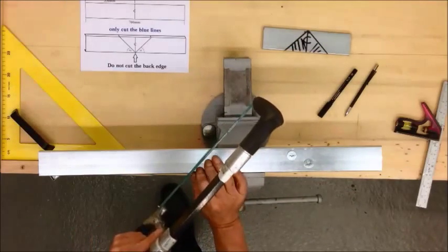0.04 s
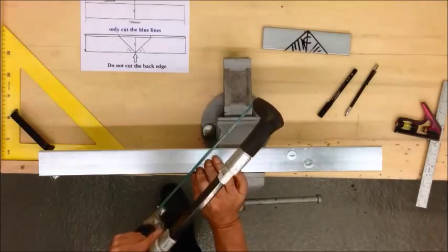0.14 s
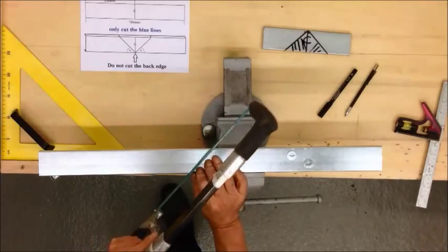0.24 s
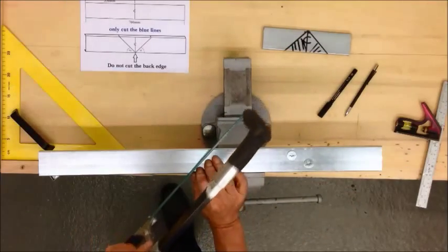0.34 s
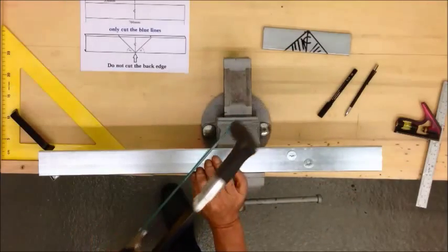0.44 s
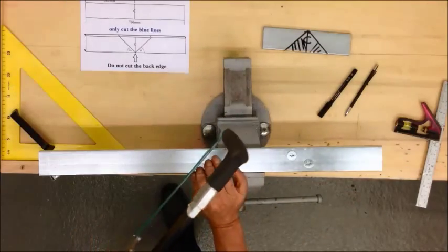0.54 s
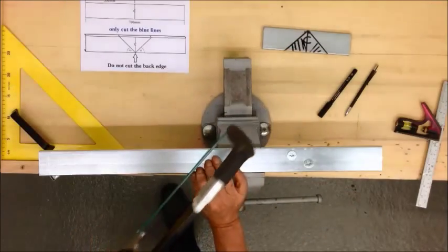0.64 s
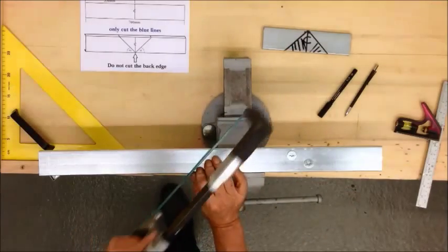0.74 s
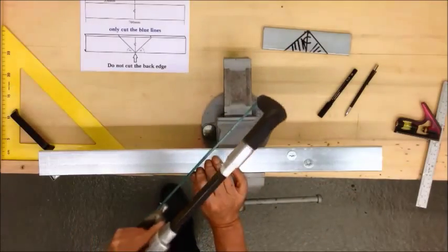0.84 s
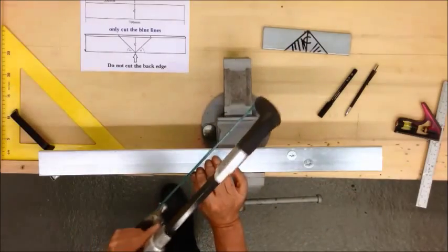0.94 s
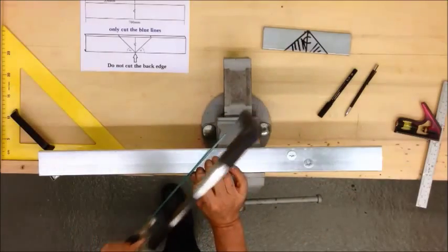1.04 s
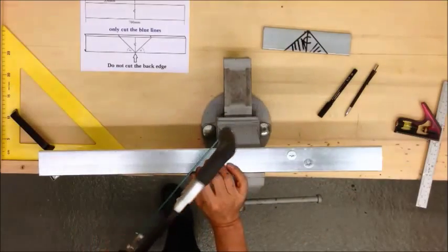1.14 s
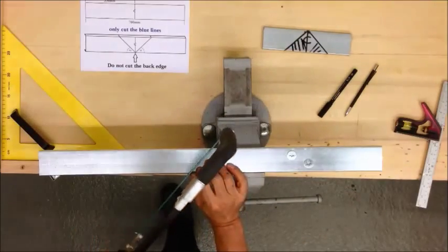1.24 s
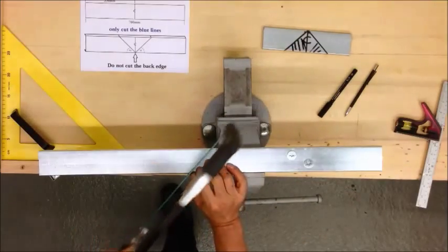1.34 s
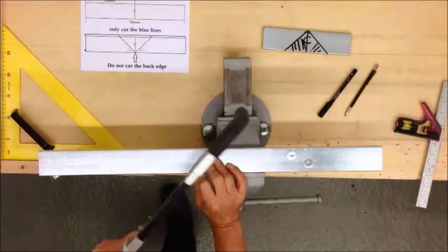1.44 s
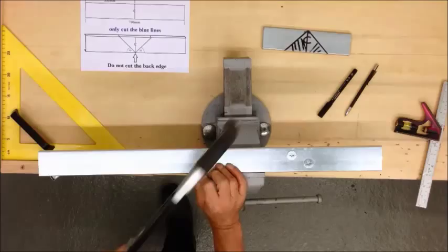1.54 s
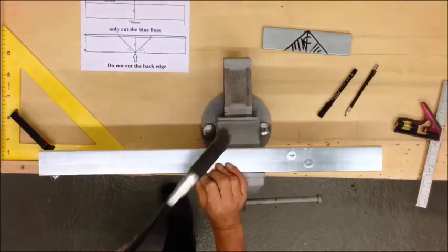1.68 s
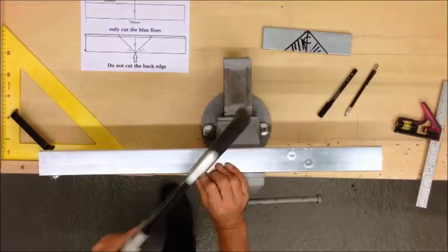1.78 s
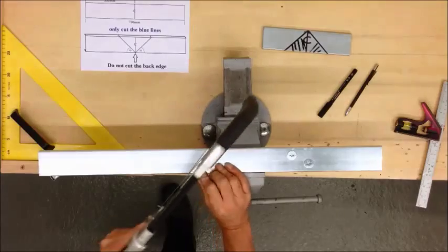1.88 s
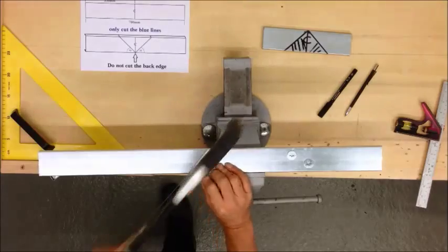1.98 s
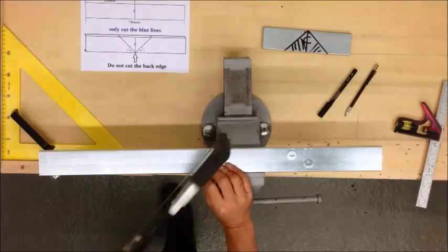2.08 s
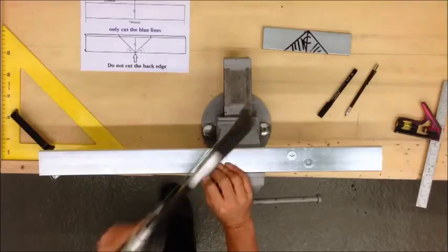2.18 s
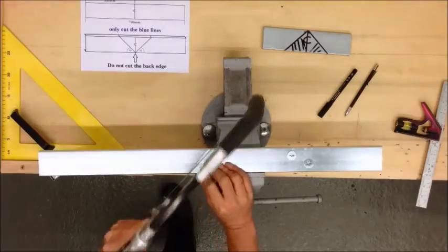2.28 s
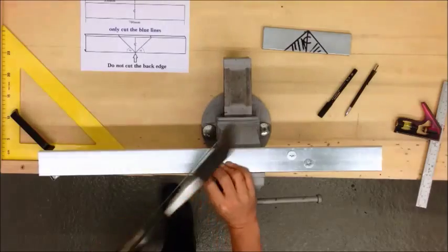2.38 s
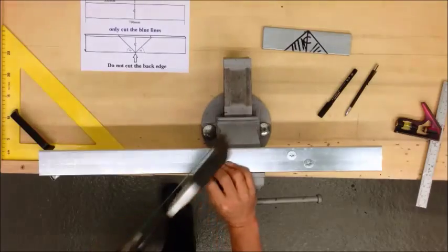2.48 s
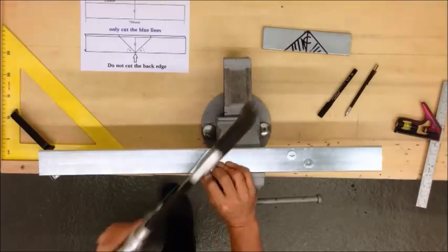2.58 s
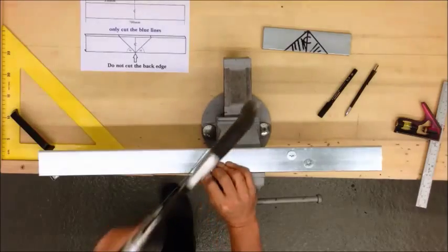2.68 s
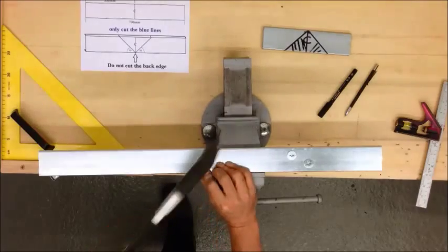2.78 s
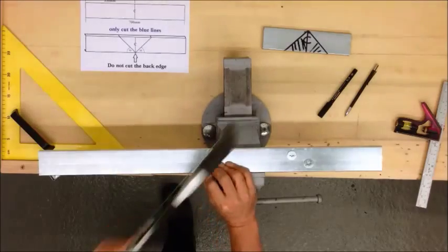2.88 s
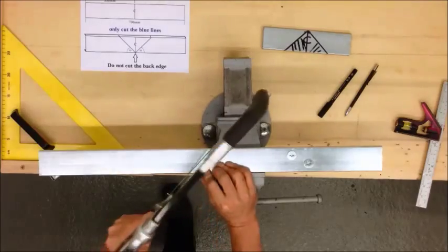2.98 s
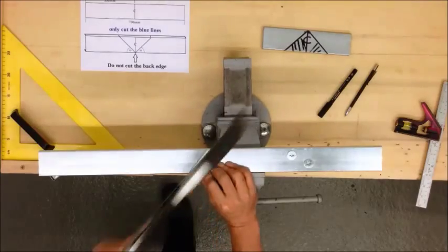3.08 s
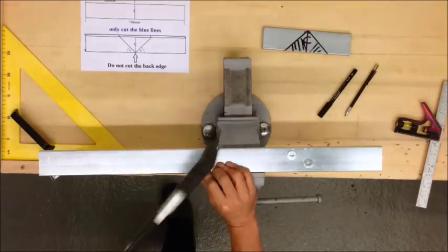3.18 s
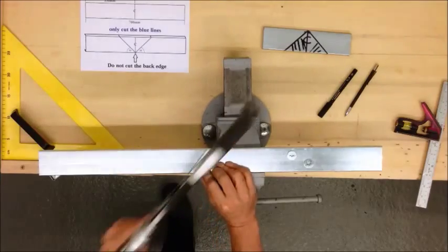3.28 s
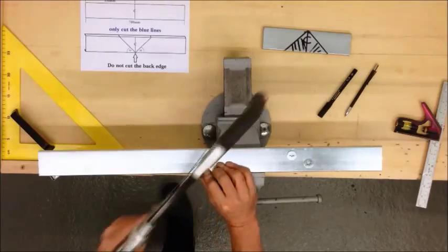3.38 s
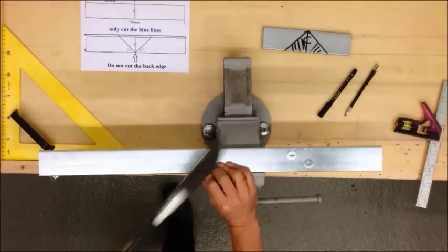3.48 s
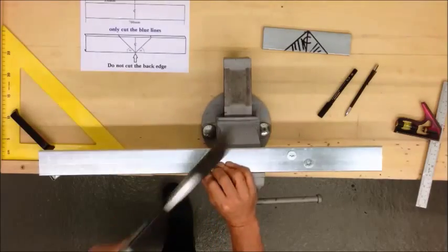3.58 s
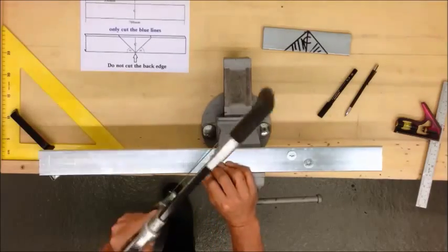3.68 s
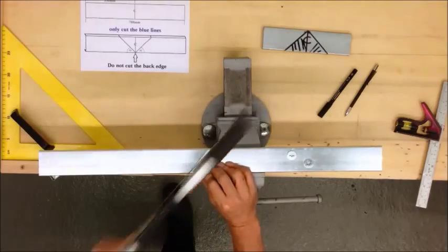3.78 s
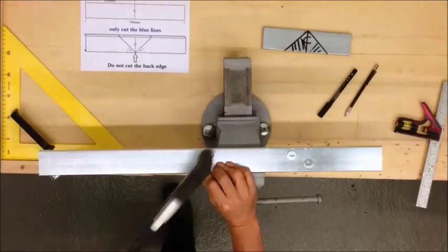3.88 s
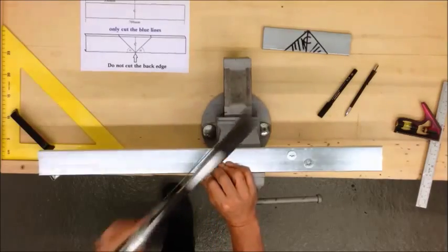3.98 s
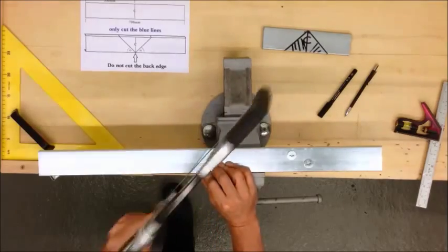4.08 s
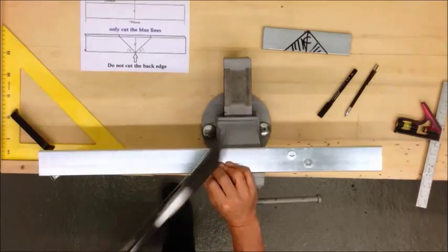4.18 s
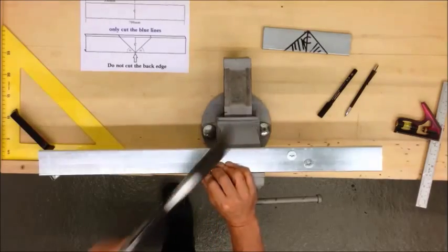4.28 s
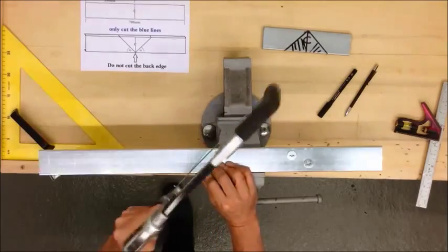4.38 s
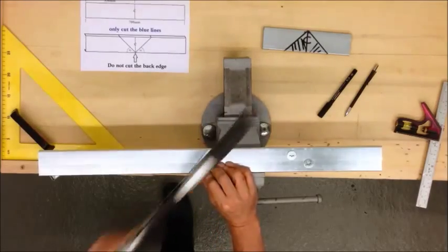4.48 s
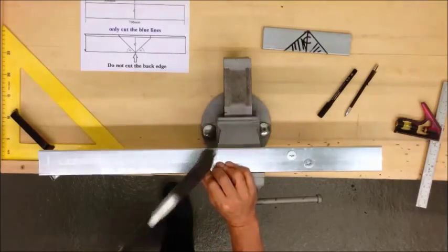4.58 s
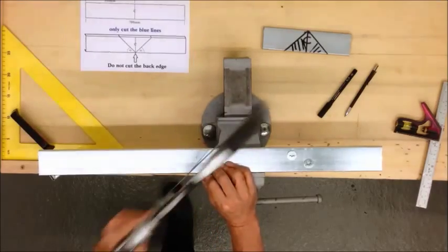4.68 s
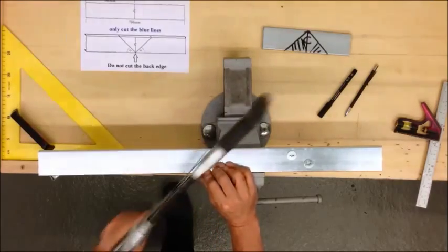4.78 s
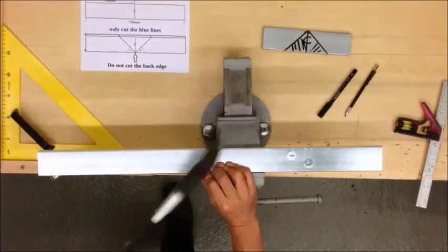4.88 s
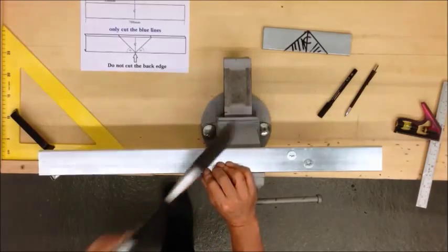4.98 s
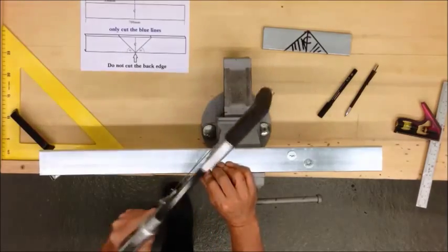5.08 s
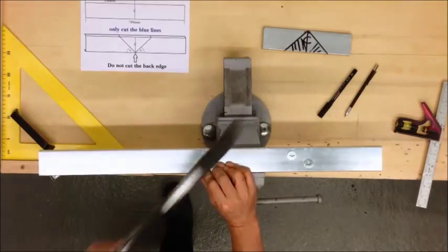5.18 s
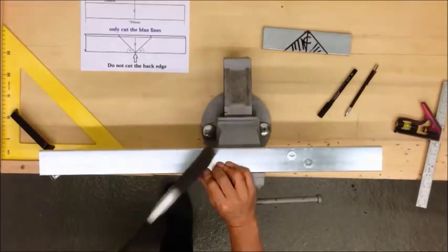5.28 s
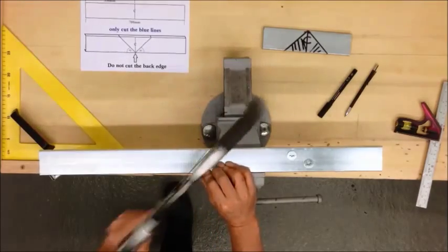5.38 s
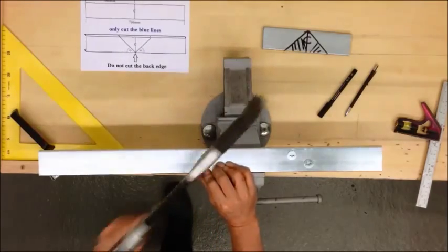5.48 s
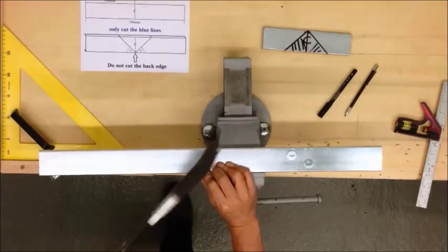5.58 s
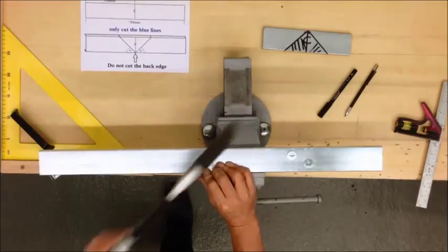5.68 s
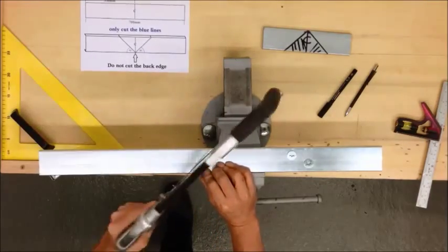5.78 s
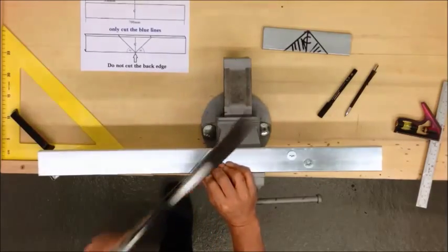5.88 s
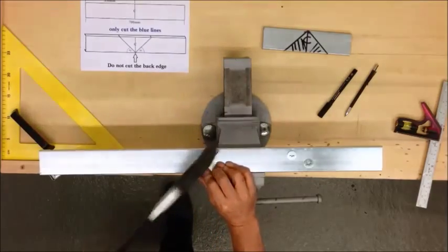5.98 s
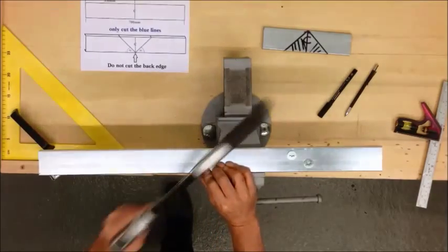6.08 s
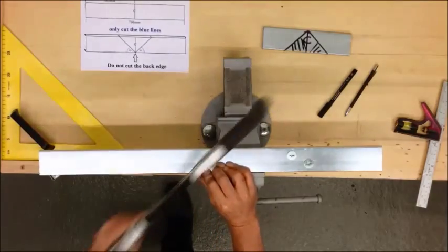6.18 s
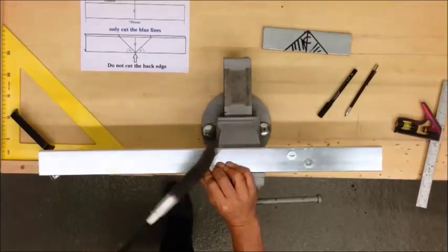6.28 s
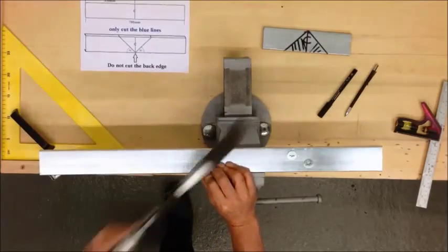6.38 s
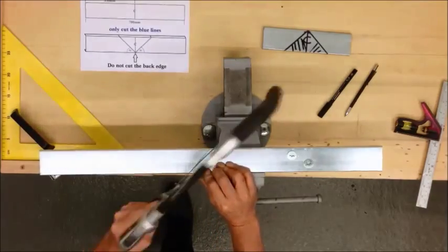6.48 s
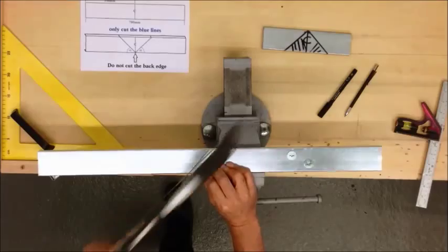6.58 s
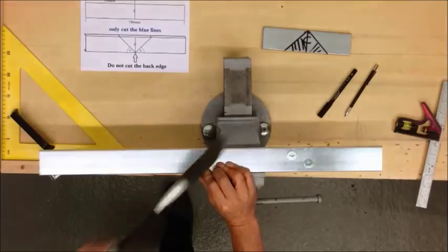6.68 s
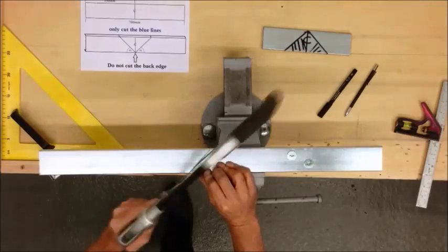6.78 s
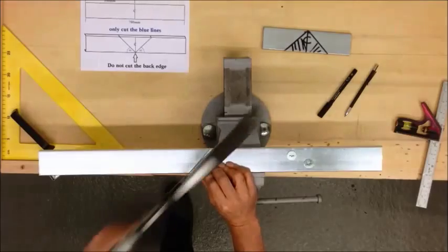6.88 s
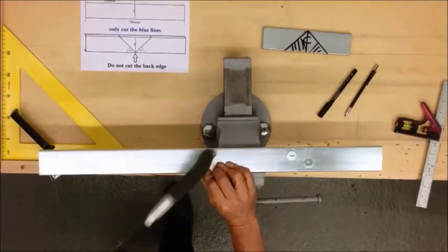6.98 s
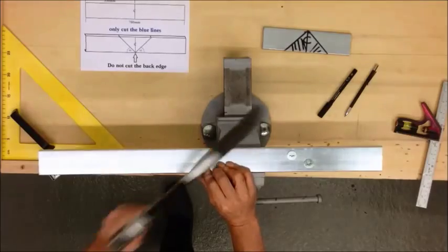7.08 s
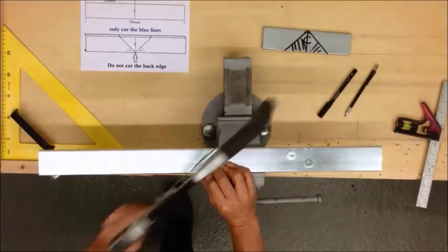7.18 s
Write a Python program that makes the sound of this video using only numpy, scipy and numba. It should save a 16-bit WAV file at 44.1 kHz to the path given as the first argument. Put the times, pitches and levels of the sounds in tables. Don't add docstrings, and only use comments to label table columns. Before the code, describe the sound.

Close-up hacksaw cutting a thin steel strip in a bench vise. A faint touch and hesitant scrapes come first, with sharp bites and small gaps; then push and pull strokes join into a fast, loud, even rasp, about six scrapes per second. The sheet rings nasally, chips hiss, the blade catches with brief squeaky chirps, and the bench thuds dully. Quiet ventilation and a short indoor echo lie behind.

```python
import sys
import numpy as np
from scipy import signal
from scipy.fft import rfft, irfft, next_fast_len
from scipy.io import wavfile
from scipy.ndimage import uniform_filter1d
from numba import njit

SR = 44100
rng = np.random.default_rng(int(sys.argv[2]) if len(sys.argv) > 2 else 0)


def invert_db(level):
    return 10 ** (np.asarray(level, dtype=float) / 20)


def int16_out(signal):
    q = np.round(np.clip(np.atleast_2d(signal).T, -1, 1) * 32767)
    wavfile.write(sys.argv[1], SR, q.astype(np.int16))


N = 319284

# pitch_hz, level_db per Hz
HUM = [(22, -22), (92, 10.5), (216, 0), (472, -1.5), (1270, -5), (4090, -19.5), (4780, -32), (15000, -26)]
HUM_DB = -72.5

# start_s, length_s, tooth_ringing_db, chip_hiss_minus_ringing_db, top_tooth_rate_hz
PUSHES = [(0.604, 0.1, -45.0, -3.0, 1560), (1.132, 0.2, -43, -4.5, 1410), (1.672, 0.13, -39.0, -5.5, 1424),
          (2.072, 0.18, -43.0, 0.5, 1716), (2.452, 0.17, -35, -2.0, 1554), (2.832, 0.17, -38.5, 2.5, 1711),
          (3.174, 0.17, -35.5, -0.5, 1703), (3.528, 0.19, -35, -1, 1725), (3.879, 0.18, -33.5, -1.5, 1750),
          (4.236, 0.16, -32.5, -2, 1763), (4.582, 0.16, -33.5, -1, 1930), (4.931, 0.17, -33, -4, 1840),
          (5.26, 0.1785, -32.0, -2.5, 2030), (5.601, 0.19, -33, -3, 1824), (5.975, 0.18, -33, -2, 2040),
          (6.303, 0.18, -31.5, -4, 1990), (6.645, 0.18, -32.0, -5, 2064), (6.99, 0.15, -30, -5.0, 2022)]
PULLS = [(-0.3, 0.57, -69, -7.5, 1412), (0.358, 0.36, -51, -7, 1386), (0.778, 0.21, -46.5, -2.5, 1480),
         (1.484, 0.12, -51, -2, 1455), (1.792, 0.21, -43.0, -4.0, 1422), (2.234, 0.17, -40.5, -3, 1648),
         (2.576, 0.21, -41, -3.5, 1596), (2.978, 0.17, -36.5, -2.5, 1716), (3.318, 0.19, -34, -4.0, 1690),
         (3.684, 0.19, -33.5, -3, 1816), (4.057, 0.16, -33.5, -1.5, 1905), (4.414, 0.15, -34.0, 0.5, 1920),
         (4.76, 0.14, -33.5, -2, 2020), (5.098, 0.15, -31.5, -2.5, 1750), (5.43, 0.17, -30, -6, 1810),
         (5.765, 0.18, -34, -4.5, 1780), (6.107, 0.2, -35.5, -4.5, 1970), (6.438, 0.22, -33, -7.5, 1960),
         (6.818, 0.17, -35.0, -6.5, 2016), (7.162, 0.14, -31.0, -6, 2170)]
TOUCHES = [
    (.336, .2, -59.5, -6.5, 1200),
    (.797, 0.099, -47, -9, 1290),
    (1.835, 0.1002, -44, -8, 1300),
    (6.495, 0.1347, -35, -5.5, 2200),
    (6.172, 0.1004, -37, -3.5, 2100),
]
# full_force_from_share, full_until_share, drop_at_start_db, drop_at_end_db,
# rate_glide_share, rate_sag_share, vise_peak_at_share
PUSH_SHAPE = (0.2008, 0.5494, 12.5, 12.5, .3, .25, 0.12)
PULL_SHAPE = (0.51, 0.8025, 11.5, 12.5, -.5, 0.73, -0.06)
REST_DB = -81
IDLE_TEETH_HZ, RATE_STRETCH = 1289, 1.05
CHIP_DEPTH, VISE_DEPTH = 0.11, -0.18
FRAME_DB, FRAME_PER_CHIP, FRAME_FADE_DB_PER_S = 1, 0.87, -0.83
VISE_DB, VISE_LOUDEST_S, VISE_FADE_DB_PER_S = -15, 2.9, -1.8
VISE_PEAK_DB, VISE_PEAK_WIDTH = 6, 0.14

# pitch_hz, width_hz, level_db
SHEET = [(1183, 31, -3.5), (1260, 27, -2.5), (1338, 11, 6.5), (1400, 14, -4.5), (1456, 12.5, -0.5),
         (1519, 19, -5), (1693, 15.4, -4), (1783, 26, -10), (1922, 29, -5.5), (2040, 13, -9),
         (2154, 35, -3), (2303, 49, -0.5), (2420, 35, 2), (2642, 51, -2)]
FLAP_HZ, FLAP_WIDTH_HZ = 1267, 217
FLAP_DB, FLAP_FADE_DB_PER_S = -2, -2.5

# pitch_hz, level_db per Hz
CHIPS = [(300, -42), (1030, -9), (1700, -9), (3000, -6.5), (4500, -8), (8000, -9.5), (12500, -16.5),
         (15500, -21)]
# pitch_hz, width_hz, level_db
BLADE = [(5152, 78, -11), (5931, 12, 5.5), (5964, 230, -11), (7520, 120, -7.5), (9140, 33, -14),
         (13100, 640, -15)]
# pitch_hz, width_hz, level_db
FRAME = [(3398, 43, -5.5), (3553, 18.6, -3.5), (3710, 83, -9), (3908, 24, -4.5), (4074, 42, 1),
         (4228, 60, -2.5), (4370, 40, -12)]
# time_s, pitch_hz
KERF = [
    (0, 3990),
    (2.2, 4125),
    (3.5, 4160),
    (7.24, 4014),
]

# pitch_hz, width_hz, level_db
TABLE = [(115.2, 22.4, -2.5), (193, 28.6, 0), (245.5, 42.4, -3.5), (355.2, 15, -5), (442, 29, -11.5)]
# pitch_hz, width_hz, level_db
VISE = [(543, 41, -7.5), (648.2, 14.8, 1.5), (770, 29, -2), (859, 44, 1), (921, 14.7, 5.5)]
# time_s, shudder_db, slow_sway_minus_shudder_db
SHOVES = [(0.51, -77, -17), (0.96, -64, -18), (1.26, -71, -11), (1.59, -61, -13), (1.82, -56.5, -13),
          (1.97, -58.5, -20), (2.38, -56.5, -15), (2.49, -58, -14), (2.76, -58, -21), (3.02, -58, -12),
          (3.21, -58, -21), (3.48, -56, -15), (3.859, -61, -9), (4.14, -49.5, -20), (4.46, -63, -22),
          (4.87, -62, -26), (4.989, -56, -16), (5.27, -58, -23), (5.59, -58, -25.5), (5.85, -57.5, -31),
          (6.08, -59, -23), (6.35, -68, -33), (6.53, -63, -18), (6.98, -59.5, -27), (7.09, -62, -27)]
SHOVE_S, SWAY_S = 0.043, 0.028
BENCH_DB, BENCH_PER_FORCE, SWAY_DB = -61.5, 0.62, -24
BENCH_FADE_DB_PER_S, SMOOTH_FROM_S = -2.5, 4.8
# time_s, level_db
GROANS = [(.95, -65), (1.14, -67), (2.0, -69), (2.36, -59), (2.95, -62), (3.12, -58), (3.47, -58),
          (3.669, -57), (4.08, -57), (4.22, -57), (4.56, -57.5), (5.58, -48.5), (5.74, -62), (5.93, -56),
          (6.25, -58), (6.63, -57.5)]
GROAN_S, GROAN_HZ, GROAN_WIDTH_HZ = 0.043, 580, 680

# time_s, peak_db
BITES = [(0.1645, -42), (0.194, -48.5), (0.3292, -57), (0.628, -24), (0.8101, -53), (1.126, -32),
         (1.489, -38.5), (1.6891, -46), (2.0724, -28), (2.452, -28), (2.8441, -28), (3.1913, -26),
         (3.548, -26), (3.905, -17), (4.2551, -17.5), (4.6108, -20.5), (4.7891, -17), (4.955, -19.5),
         (5.2861, -22.5), (5.64, -17), (5.9985, -27), (6.186, -19.5), (6.3232, -25), (6.678, -26.5),
         (7.002, -26), (7.1938, -30.5)]

# time_s, peak_db, chatter_hz
CATCHES = [(0.5687, -36, 1210), (0.6306, -43, 1360), (0.8089, -31.5, 1260), (1.113, -43, 1150),
           (1.2058, -38, 1408), (1.2634, -23.5, 1402), (1.577, -39, 1260), (1.6876, -34, 1244),
           (1.7275, -29, 1327), (2.1738, -29, 2380), (2.4546, -37, 1360), (2.845, -40, 1414),
           (3.05, -29, 1807), (3.2052, -28, 1210), (3.2411, -30, 1694), (3.3638, -27.5, 1263),
           (3.389, -21, 1683), (3.7391, -28, 1695), (3.9061, -39, 1440), (4.0836, -22, 1710),
           (4.14, -19.5, 2160), (4.2563, -32, 1412), (4.4316, -26.5, 2386), (4.472, -23.5, 2190),
           (4.5155, -22, 1746)]
# time_s, peak_db, chatter_hz
DEEP_CATCHES = [(4.6128, -21.5, 1932), (4.7891, -22, 2034), (4.8265, -18.5, 2180), (4.9578, -20, 1724),
                (5.0024, -26, 1910), (5.11, -24.5, 1340), (5.1398, -19, 1800), (5.1747, -17.5, 1820),
                (5.286, -21.5, 2390), (5.3074, -25.5, 1800), (5.471, -24, 1800), (5.5205, -18, 1790),
                (5.6414, -18.5, 1330), (5.6771, -19.5, 1930), (5.726, -30, 1930), (5.8899, -21.5, 1800),
                (5.9973, -22.5, 2404), (6.0264, -22.5, 1787), (6.0644, -32, 2330), (6.1875, -19.5, 2094),
                (6.3225, -22, 2450), (6.4269, -29, 2336), (6.5173, -21, 2106), (6.5895, -26.5, 2080),
                (6.6805, -15.5, 2450), (6.7272, -34, 2130), (6.8676, -22.5, 2120), (7.0019, -24, 2516),
                (7.0659, -28, 2420), (7.1976, -21.5, 2210)]
CATCH_SHAKE_DB = -16.5

ROOM_T60_S, ROOM_DAMP, ROOM_DB = 0.52, 0.19, -18.5
TOP_HZ = 15290


def unit(x):
    return x / np.sqrt(np.mean(x ** 2))


def curve(table):
    s, *columns = np.transpose(table)
    return [np.interp(np.arange(N) / SR, s, c) for c in columns]


def walk(rate):
    hold = int(SR / rate)
    steps = np.repeat(rng.standard_normal(N // hold + 1), hold)
    return 1.3 * uniform_filter1d(uniform_filter1d(steps, hold), hold)[:N]


def colour(x, points):
    hz, db = np.transpose(points)
    size = next_fast_len(N)
    f = np.arange(size // 2 + 1) * SR / size
    gain = invert_db(np.interp(np.log(f + 1), np.log(hz), db))
    return irfft(rfft(x, size) * gain, size)[:N]


@njit
def svf(x, hz, width):
    y, band, low = np.empty(len(x)), 0., 0.
    for i in range(len(x)):
        g, k = np.pi * hz[i] / SR, width / hz[i]
        g += g ** 3 / 3 + g ** 5 * 2 / 15
        v = (band + g * (x[i] - low)) / (1 + g * (g + k))
        band, low, y[i] = 2 * v - band, low + 2 * g * v, k * v
    return y


def steep_band(x, hz, width):
    centre = np.full(N, hz, float)
    return unit(svf(svf(x, centre, width), centre, width))


def ring(x, modes, patchy_db, rate):
    out = np.zeros(N)
    for k, (hz, width, db) in enumerate(modes):
        flickering = x * invert_db(patchy_db * walk(rate))
        out += (-1) ** k * invert_db(db) * svf(flickering, np.full(N, 1. * hz), 1. * width)
    return out


def grit(share, spread_db):
    chance = rng.random((2, N))
    size = invert_db(-spread_db * np.log(chance[0] + 1e-6)) * (chance[1] < share)
    return unit(size * rng.standard_normal(N))


def bumps(times_s, levels_db, width_s):
    t = np.arange(N) / SR
    return sum(invert_db(db) * np.exp(-((t - s) / width_s) ** 2) for s, db in zip(times_s, levels_db))


def workshop():
    return invert_db(HUM_DB + 1.0 * walk(3.4)) * unit(colour(rng.standard_normal(N), HUM))


def strokes():
    t = np.arange(N) / SR
    ring_db, chip_db = np.full(N, 1. * REST_DB), np.full(N, -6.)
    vise_db, rate_hz = np.zeros(N), np.full(N, 1350.)
    for rows, shape in ((PUSHES + TOUCHES, PUSH_SHAPE), (PULLS, PULL_SHAPE)):
        full, until, start_db, end_db, glide, sag, vise_at = shape
        for s, length, db, hiss_db, hz in rows:
            share = (t - s) / length
            rise_db = start_db * (share / full - 1)
            fall_db = end_db * (until - share) / (1 - until)
            drop_db = np.minimum(0, np.minimum(rise_db, fall_db))
            leads = db + drop_db > ring_db
            share, drop_db = share[leads], drop_db[leads]
            ring_db[leads] = db + drop_db
            chip_db[leads] = hiss_db + CHIP_DEPTH * np.maximum(drop_db, -start_db)
            peak = np.exp(-((share - vise_at) / VISE_PEAK_WIDTH) ** 2)
            vise_db[leads] = VISE_PEAK_DB * peak + VISE_DEPTH * drop_db
            along = 2 * np.clip(share, 0, 1) - 1
            speed = 1 + glide * along - sag * along ** 2
            rate_hz[leads] = IDLE_TEETH_HZ + RATE_STRETCH * (hz - IDLE_TEETH_HZ) * speed
    frame_db = FRAME_DB + FRAME_PER_CHIP * chip_db + FRAME_FADE_DB_PER_S * t
    vise_db = ring_db + vise_db + VISE_DB + VISE_FADE_DB_PER_S * np.abs(t - VISE_LOUDEST_S)
    return [uniform_filter1d(c, SR // 100) for c in (ring_db, chip_db, rate_hz, frame_db, vise_db)]


def teeth(rate_hz, pressure):
    wobble = 1 + .06 * walk(60) + .06 * walk(400)
    phase = np.cumsum(rate_hz * wobble) / SR
    pluck = np.sin(2 * np.pi * phase) * invert_db(2.9 * walk(150))
    force = pressure * (unit(pluck) + invert_db(7.5) * grit(.3, 3.2))
    bare = pressure * steep_band(grit(.3, 2.05), rate_hz, 940.0)
    flap = pressure * steep_band(grit(.3, 2.9), FLAP_HZ, FLAP_WIDTH_HZ)
    flap_level = invert_db(FLAP_DB + FLAP_FADE_DB_PER_S * np.arange(N) / SR)
    sheet = invert_db(2.5) * ring(force, SHEET, patchy_db=4.5, rate=40) + invert_db(-7.5) * bare + flap_level * flap
    swell = uniform_filter1d(sheet ** 2, SR // 30) / uniform_filter1d(pressure ** 2, SR // 30)
    sheet = sheet * np.maximum(swell, 1e-3) ** -.3
    band = signal.butter(3, (1100, 2750), "band", fs=SR, output="sos")
    return invert_db(-1.0) * signal.sosfilt(band, sheet)


def overtones(x, t60):
    t = np.arange(SR // 10) / SR
    response = rng.standard_normal(len(t)) * np.exp(-np.log(1000) * t / t60)
    return signal.fftconvolve(x, response / np.sqrt(np.sum(response ** 2)))[:N]


def chips(pressure, frame_pressure):
    force = pressure * invert_db(1.0 * walk(40)) * grit(.7, 1.0)
    broad = colour(force, CHIPS) / np.std(colour(rng.standard_normal(N), CHIPS))
    crowd = sum(overtones(broad * invert_db(3.5 * walk(8)), t60=0.052) for _ in range(3))
    broad = .9 * broad + .22 * crowd
    blade = invert_db(15.0) * ring(force, BLADE, patchy_db=3.5, rate=8)
    shake = frame_pressure * grit(.5, 1.23)
    frame = invert_db(16.5) * ring(shake, FRAME, patchy_db=4.0, rate=30)
    flicker = invert_db(3.2 * walk(50))
    edge = invert_db(10.0) * svf(shake * flicker, curve(KERF)[0], 240.0)
    fine = unit(svf(grit(1.0, 1.0), np.full(N, 12200.), 5100.0))
    sizzle = invert_db(8) * pressure ** 1.502 * fine
    return invert_db(-2.0) * broad + blade + frame + edge + sizzle


def bench(stroke_db, vise_db):
    t = np.arange(N) / SR
    force_db = BENCH_PER_FORCE * (uniform_filter1d(stroke_db, SR // 2) + 40)
    steady = invert_db(BENCH_DB + force_db + BENCH_FADE_DB_PER_S * np.maximum(t - SMOOTH_FROM_S, 0))
    shove_s, shove_db, sway_db = np.transpose(SHOVES)
    shudder = steady + bumps(shove_s, shove_db, SHOVE_S)
    lurch = invert_db(SWAY_DB) * steady + bumps(shove_s, shove_db + sway_db, SWAY_S)
    top = ring(rng.standard_normal(N), TABLE, patchy_db=2.3, rate=9.2)
    top = unit(signal.sosfilt(signal.butter(4, 80, "high", fs=SR, output="sos"), top))
    sway = steep_band(grit(.002, 1.2), 55., 70.)
    vise = unit(ring(rng.standard_normal(N), VISE, patchy_db=4.5, rate=20))
    groan = steep_band(grit(.2, 1.8), GROAN_HZ, GROAN_WIDTH_HZ)
    groan = groan * bumps(*np.transpose(GROANS), GROAN_S)
    return shudder * top + lurch * sway, invert_db(vise_db) * vise + groan


def bites():
    start = np.zeros(N)
    s, db = np.transpose(BITES)
    start[(s * SR).astype(int)] = invert_db(db - 13.5)
    return signal.lfilter([1], [1, -np.exp(-1 / (0.0054 * SR))], start)


@njit
def walls(x, lags, gain, damp):
    line, soft, out = np.zeros((8, 4096)), np.zeros(8), np.zeros(len(x))
    for i in range(len(x)):
        total = 0.
        for k in range(8):
            soft[k] += (1 - damp) * (gain[k] * line[k, (i - lags[k]) & 4095] - soft[k])
            total += soft[k]
            out[i] += soft[k] * (1 - 2 * (k % 2))
        for k in range(8):
            line[k, i & 4095] = x[i] + soft[k] - total / 4
    return out


def catches():
    out, t = np.zeros(N + SR), np.arange(SR // 5) / SR
    shape = (1 - np.exp(-t / 0.0017)) * np.exp(-(t / 0.021) ** 1.4)
    for s, db, hz in CATCHES + DEEP_CATCHES:
        drift, phase = rng.standard_normal(2)
        chatter = np.sin(2 * np.pi * hz * t * (1 + 0.5 * drift * t) + phase)
        i = int(s * SR)
        out[i:i + len(t)] += invert_db(db - 7.5) * shape * chatter
    return out[:N] * invert_db(2.8 * walk(200))


def scene():
    ring_db, chip_db, rate_hz, frame_db, vise_db = strokes()
    bite = bites()
    chatter = catches()
    jolt = invert_db(CATCH_SHAKE_DB) * np.sqrt(np.abs(uniform_filter1d(chatter ** 2, SR // 200)))
    chip_force = invert_db(ring_db + chip_db) + invert_db(-11.5) * bite
    frame_force = invert_db(ring_db + frame_db) + invert_db(-2) * bite + jolt
    hiss = chips(chip_force, frame_force)
    top, vise = bench(ring_db, vise_db)
    saw = teeth(rate_hz, invert_db(ring_db) + bite) + hiss + chatter + vise
    lags = np.array([701, 887, 1093, 1327, 1571, 1861, 2153, 2477])
    room = walls(saw + 1e-18, lags, invert_db(-60 * lags / SR / ROOM_T60_S), ROOM_DAMP)
    return (saw + invert_db(ROOM_DB) * room + top + workshop())[None]


def band_limit(x):
    return signal.sosfilt(signal.butter(12, 15770, fs=SR, output="sos"), x)


def record(dry):
    spectrum = rfft(dry)
    hz = np.arange(spectrum.shape[1]) * SR / N
    mix = irfft(spectrum * (hz < TOP_HZ), N)
    return band_limit(mix)


dry = scene()
out = record(dry)
int16_out(out)
```